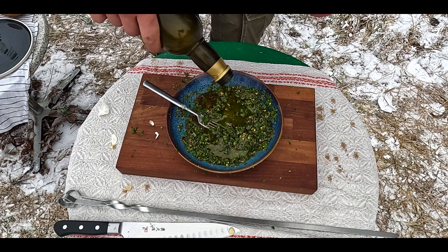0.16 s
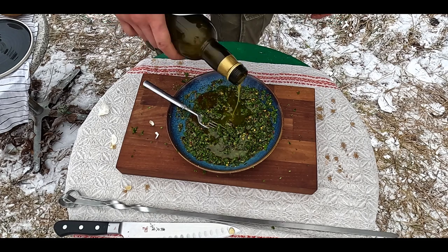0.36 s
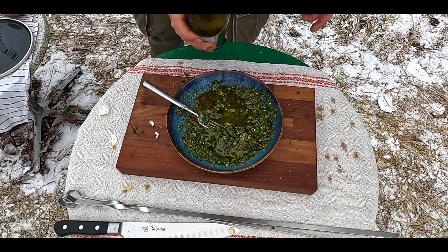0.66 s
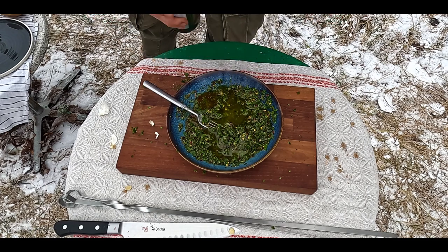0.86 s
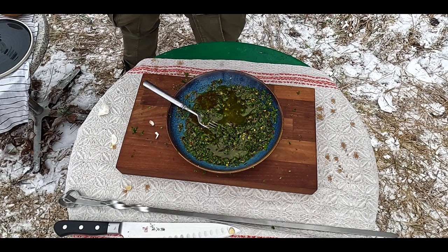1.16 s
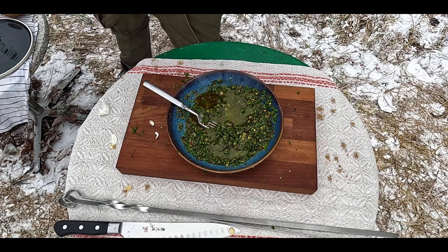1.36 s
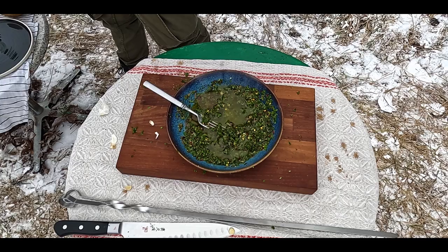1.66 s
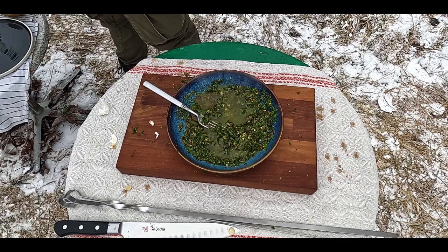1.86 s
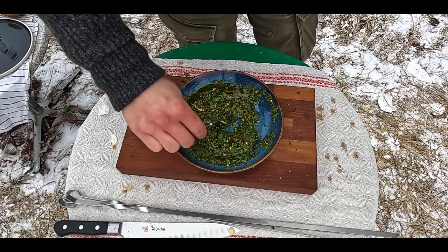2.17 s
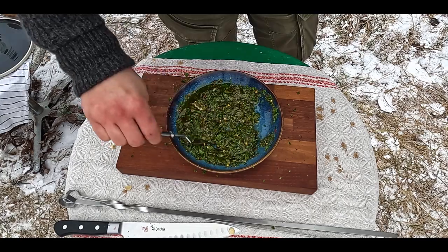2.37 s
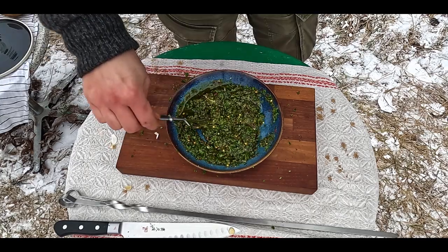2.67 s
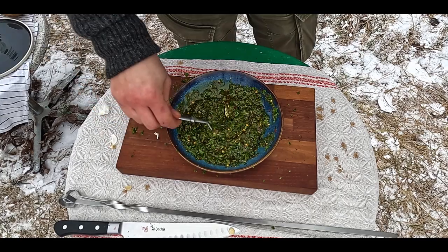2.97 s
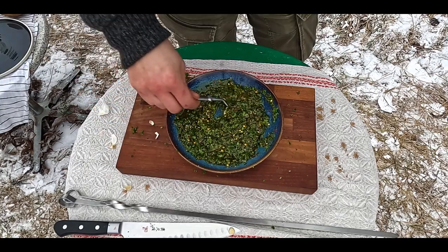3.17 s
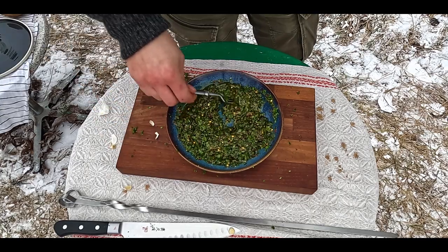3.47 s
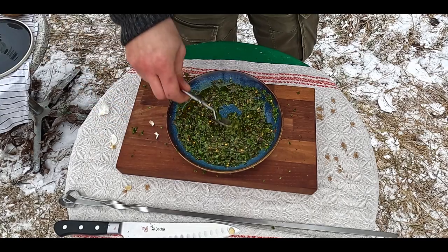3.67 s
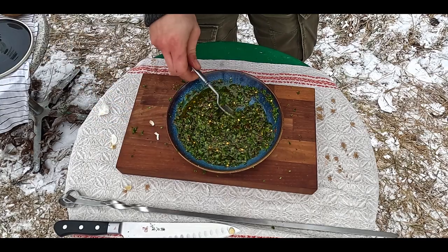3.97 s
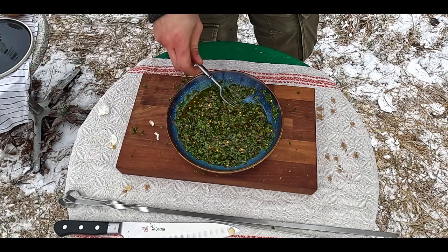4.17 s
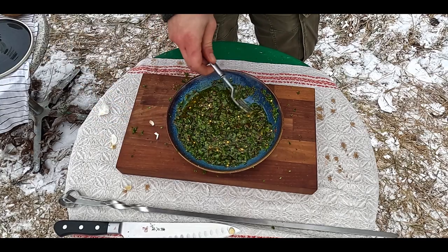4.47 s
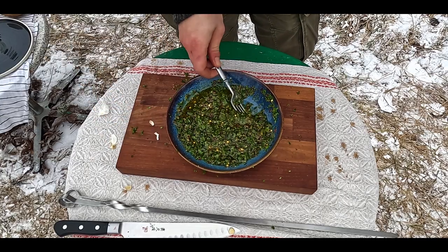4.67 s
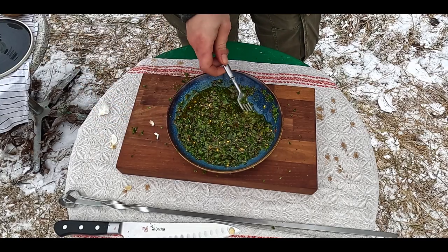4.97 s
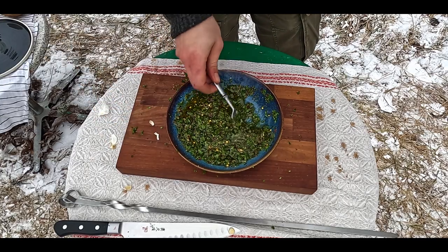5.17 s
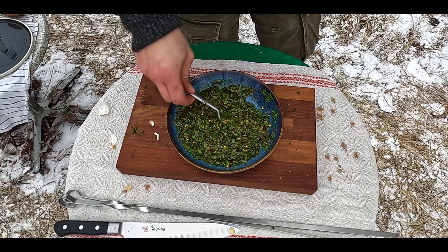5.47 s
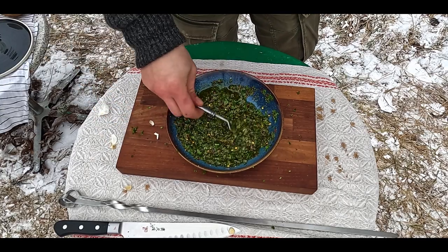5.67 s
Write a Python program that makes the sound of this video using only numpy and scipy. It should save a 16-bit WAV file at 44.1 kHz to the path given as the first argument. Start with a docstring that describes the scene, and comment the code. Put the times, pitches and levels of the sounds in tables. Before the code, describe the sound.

Outdoors, a bottle gulps softly, crusty snow cracks underfoot, then wet squelchy stirring builds to a run of short, bright fork-on-bowl clinks.

```python
"""A steel fork stirs a wet mix of oil and chopped herbs in a ceramic bowl, outdoors in winter.
The tines skid and ring the bowl, modal knocks answer from its board; resonant grains squelch, pop and spray.
Before that, oil glugs from a glass bottle (gliding tones) and icy snow crunches (bursts of filtered grains).
Light air sways and rumbles at the microphone under an even hiss (filtered noise)."""
import sys
import numpy as np
from scipy import signal
from scipy.fft import rfft, irfft
from scipy.io import wavfile
from scipy.ndimage import map_coordinates

SR = 44100
rng = np.random.default_rng(int(sys.argv[2]) if len(sys.argv) > 2 else 0)


def wav_record(signal):
    """Record a signal, one row per channel, as 16-bit PCM in the file named by sys.argv[1]."""
    frames = np.transpose(np.atleast_2d(signal))
    bounded = np.clip(frames, -1, 1)
    # unit amplitude maps onto the largest positive 16-bit level
    quanta = np.round(bounded * 32767).astype(np.int16)
    wavfile.write(sys.argv[1], SR, quanta)


N = 256750  # samples
T = np.arange(N) / SR  # s, whole scene
HIT = np.arange(SR // 5) / SR  # s, span of one event

# fork on bowl: t/s, skid peak/dB, skid f/Hz, ring re skid/dB, knock peak/dB
FORK_CLINKS = [(3.2332, -32, 2620, -18.5, -55.5), (3.5056, -37.5, 2490, -23, -52.5),
               (3.892, -32, 2370, -13, -34), (4.14, -45.5, 2250, -16, -44), (4.377, -25, 2280, -11, -33),
               (4.61, -45, 3100, -16.5, -61), (4.865, -31.5, 3260, -7, -40), (4.925, -32, 1930, -33, -42.5),
               (5.1015, -26, 3500, -5.5, -36.5)]
# briskness of the stirring: t/s, spray level/dB
STIR_BRISKNESS = [(2.0, -89), (2.4, -79), (2.75, -79), (3.45, -68.5), (4.3, -71.5), (5.0, -80),
                  (5.82, -84.5)]
# spectrum of wet leaves and oil: f/Hz, relative gain/dB
MASH_SPECTRUM = [(250, -7), (450, -2), (800, -9), (1150, -4), (1500, 0), (2100, -10.5), (3200, -3),
                 (4500, -11), (7000, -19)]


def fork():
    """Tines bite and skid on the glaze, ring the bowl and push it against the board."""
    # bowl and fork together: f/Hz, level before damping/dB, t60/s
    bowl_modes = [(866, -38, 0.082), (1848, -18, 0.06), (2320, -10.5, 0.028), (3070, -3.5, 0.056),
                  (3540, -4, 0.028), (4480, -1, 0.054), (7860, -2, 0.048), (9850, -9, 0.038),
                  (11940, 6, 0.042), (12000, -10, .025), (14000, -15, .035)]
    # tine contact spectrum: f/Hz, relative gain/dB
    contact_spectrum = [(300, -0.5), (1200, -5), (2300, -4.5), (2750, -9), (3400, -7.5), (4600, -0.5),
                        (5400, -8.5), (7500, -2), (9000, -12), (12000, -11), (16000, -9.5)]
    # bowl foot dropping back on the board: t/s, peak/dB, knock f/Hz
    rocks = [(4.9257, -40.5, 760), (4.9457, -29, 470), (4.9654, -38.5, 480), (4.972, -37, 420)]
    # soft low thumps: t/s, level/dB, rise/s
    thuds = [(2.0319, -34, 0.002), (4.945, -44, .008)]
    bite_s, skid_t60_s, thud_t60_s = 0.00065, 0.039, 0.11
    second_tine_s, second_tine_db = 0.006, -9.5  # tines land one after the other
    # below this ring level herbs cushion the bowl: dB lost in its top mode for each dB
    free_ring_db, damping = -12.5, 3.3
    knock_per_skid, knock_lag_s = 0.12, 0.00185  # pitch ratio; the board answers late

    out = np.zeros(N)
    for s, db, skid_hz, ring_db, knock_db in FORK_CLINKS:
        top_db = damping * min(ring_db - free_ring_db, 0)
        top_hz = bowl_modes[-1][0]
        modes = [(hz, level + top_db * (hz / top_hz) ** 2, t60) for hz, level, t60 in bowl_modes]
        for k in range(2):
            grit = grains(len(HIT), rate=11000, spread_db=4) * fade(skid_t60_s)
            grit = colour(grit, contact_spectrum)
            skid = crest(resonate(grit, skid_hz, q=10) + 0.3 * grit)
            onset = 1 - np.exp(-HIT / bite_s)
            contact = (skid + amp(ring_db) * ring(modes, scatter_db=1.5)) * onset
            add(out, s + k * second_tine_s, amp(db + k * second_tine_db) * contact)
        board = knock(knock_per_skid * skid_hz, soft_s=0.0024, focus_db=5.5)
        add(out, s + knock_lag_s, amp(knock_db) * board)
    for s, db, push_hz in rocks:
        add(out, s, amp(db) * knock(push_hz, soft_s=0.00013, focus_db=13))
    for s, db, rise_s in thuds:
        decay = fade(thud_t60_s) * np.linspace(1, 0, len(HIT))
        add(out, s, -amp(db) * decay * (1 - np.exp(-(HIT / rise_s) ** 2)))
    return out


def knock(push_hz, soft_s, focus_db):
    """Board modes lose focus_db per octave from the push pitch; a soft push lets them swell."""
    # board: f/Hz, level at push pitch/dB, t60/s
    board_modes = [(183.7, -9, 0.087), (330.4, -2, 0.054), (437.4, -5, 0.047), (491, -3.5, 0.036),
                   (600, -15, 0.032), (762, -10, 0.027), (869, -6.5, 0.1), (1308, -12.5, 0.049),
                   (1915, -4.5, 0.037)]
    modes = [(hz, db - focus_db * abs(np.log2(hz / push_hz)), t60) for hz, db, t60 in board_modes]
    return crest(ring(modes, scatter_db=3.5) * (1 - np.exp(-HIT / soft_s)))


def herbs():
    """Oily leaves squelch and pop under each stroke while tiny films burst in a fine spray."""
    # fork strokes: middle t/s, rms/dB, half length/s, f/Hz, spray level/dB
    squelches = [(2.066, -60, 0.026, 2200, -56.5), (2.168, -61.5, 0.017, 2030, -58.5),
                 (2.502, -56.5, 0.025, 3360, -68.5), (2.865, -62.5, .022, 3280, -71),
                 (2.924, -59, 0.009, 2400, -74), (2.99, -72, 0.012, 3000, -67),
                 (3.131, -67, 0.03, 1820, -64), (3.43, -70, 0.013, 2570, -62),
                 (3.578, -61, 0.046, 2390, -64), (5.462, -63.5, 0.038, 1770, -69.5),
                 (5.575, -67.5, 0.039, 2580, -67.5), (5.772, -58.5, 0.026, 3170, -68)]
    # clearest wet pops: t/s, peak/dB, f/Hz
    clear_pops = [(2.037, -45.5, 2500), (2.433, -45, 4570), (2.476, -44.5, 3520), (2.815, -46, 2400),
                  (3.076, -44, 4560), (3.574, -42, 1770), (3.662, -41.5, 3570)]
    # long drags through the thick of the mix: from t/s, to t/s, level/dB
    drags = [(2.38, 3.203, -68.5), (3.35, 3.705, -71), (5.35, 5.9, -70)]
    # spray spectrum: f/Hz, relative gain/dB
    spray_spectrum = [(2500, -22.5), (5500, -17.5), (7000, 3.5), (8200, 1.5), (9400, -18.5), (11500, -1.5),
                      (16000, -21)]
    drag_edge_s = 0.34
    slosh_hz, slosh_q, slosh_db = 447, 4.5, 3  # oil sloshes behind a dragging fork
    # after a firm clink the fork slides on through the herbs
    firm_db, slide_lag_s, slide_half_s, slide_hz = -36, 0.032, 0.038, 2640
    slide_db, slide_spray_db = -68.5, -65.5
    glide_octaves = -0.25  # the pocket behind the fork opens and its pitch sinks
    pop_t60_s, pop_q, pop_click = 0.0096, 3.5, 0.15  # last: share of plain click

    spray_db, = curves(STIR_BRISKNESS)
    clumps_db = 2.2 * wobble(22)
    drag = sum(amp(db) * hold(start, end, drag_edge_s) for start, end, db in drags)
    leaves = colour(grains(N, rate=900, spread_db=2), MASH_SPECTRUM)
    slosh = amp(slosh_db) * wander(leaves, slosh_hz, slosh_q, octaves=0.19)
    mash = drag * amp(clumps_db / 2) * unit(leaves + slosh)
    spray_power = (T > STIR_BRISKNESS[0][0]) * amp(spray_db + 1.16 * clumps_db) ** 2

    slides = [(s + slide_lag_s, slide_db, slide_half_s, slide_hz, slide_spray_db)
              for s, db, *_ in FORK_CLINKS if db > firm_db]
    for s, db, half_s, hz, stroke_spray_db in squelches + slides:
        squelch = stroke(half_s, hz, glide_octaves, MASH_SPECTRUM, rate=1000, spread_db=1, q=8.3)
        add(mash, s - HIT.mean(), amp(db) * squelch)
        spray_power += (amp(stroke_spray_db) * swell(s, half_s)) ** 2
    for s, db, hz in clear_pops + small_pops(count=40, scatter_db=7):
        snap = rng.standard_normal(len(HIT)) * fade(pop_t60_s)
        add(mash, s, amp(db) * crest(resonate(snap, hz, pop_q) + pop_click * snap))

    spray_gain = np.sqrt(spray_power)
    spray, stray = [spray_gain * unit(colour(grains(N, rate=3500, spread_db=2), spray_spectrum))
                    for _ in range(2)]
    fizz = 0.5 * spray_gain * bubbles(count=700, hz=6700, cycles=6.9)
    return widen(mash + spray + fizz, stray)


def small_pops(count, scatter_db):
    """Chance pops while the fork stirs, stronger when it is brisk: t/s, peak/dB, f/Hz."""
    over_spray_db, middle_hz = 14.5, 7000
    times, spray_db = np.transpose(STIR_BRISKNESS)
    when = rng.uniform(times[0], times[-1], count)
    size, octaves = rng.uniform(-1, 1, (2, count))
    peak_db = np.interp(when, times, spray_db) + over_spray_db + scatter_db * size
    return list(zip(when, peak_db, middle_hz * 2 ** octaves))


def bubbles(count, hz, cycles):
    """Tiny bursting films, each a few cycles at its own pitch; rms 1."""
    when = rng.integers(0, N, count)
    pitch, size = rng.standard_normal((2, count))
    t = HIT[:SR // 150]
    turns = np.minimum(hz * 2 ** (pitch / 2), SR / 3)[:, None] * t
    pings = amp(2.7 * size)[:, None] * np.sin(2 * np.pi * turns) * np.exp(-turns / cycles)
    at = when[:, None] + np.arange(len(t))
    return unit(np.bincount(at.ravel(), pings.ravel(), N)[:N])


def snow():
    """Bursts of breaking ice grains over the softer shearing and packing of snow."""
    # crust giving way: t/s, peak/dB, main f/Hz, t60/s
    crunches = [(.682, -47, 2730, .008), (1.095, -23, 2020, 0.02), (1.194, -34, 4100, 0.019),
                (1.2935, -41.5, 1480, .026), (1.313, -36, 1420, 0.02), (1.332, -38, 1390, 0.019),
                (1.692, -41, 2520, 0.048), (1.8264, -18.5, 2590, 0.032)]
    # snow shearing between the breaks: middle t/s, rms/dB, half length/s, f/Hz
    shears = [(0.664, -65.5, 0.031, 2460), (1.114, -49.5, 0.01, 2830), (1.18, -53, 0.023, 2410),
              (1.275, -61.5, 0.03, 1800), (1.697, -55, 0.008, 1690), (1.779, -48, 0.014, 2460),
              (1.823, -46, 0.0042, 1920)]
    # full weight comes onto one foot: middle t/s, level before halving/dB, half length/s
    steps = [(1.32, -58.5, 0.1), (1.756, -57, 0.066)]
    # crust spectrum: f/Hz, relative gain/dB
    crust_spectrum = [(150, -20), (700, -16), (1000, -14.5), (1400, -1), (2000, -2.5), (2800, -0.5),
                      (3400, -12.5), (4100, -15.5), (4800, -9), (5500, -20.5), (9000, -18), (11000, -25),
                      (16000, -29)]
    # packing spectrum: f/Hz, relative gain/dB
    packing_spectrum = [(88, -25), (150, -3.5), (489, -1.5), (1190, -7), (1390, -4), (1990, -16),
                        (2210, -5), (2580, -19), (3510, -7), (9000, -30), (11700, -76), (19800, -120)]
    aftercrack_s, aftercrack_loss_db = 0.008, 8  # each break runs on in a weaker crack
    tread_from_s, tread_to_s, tread_edge_s, tread_db = 0.46, 1.77, 0.055, -70  # feet shift

    out = np.zeros(N)
    for s, db, hz, t60 in crunches:
        for k in range(2):
            burst = colour(grains(len(HIT), rate=9800, spread_db=1) * fade(t60), crust_spectrum)
            crack = crest(resonate(burst, hz, q=7.3) + 0.2 * burst)
            add(out, s + k * aftercrack_s, amp(db - k * aftercrack_loss_db) * crack)
    for s, db, half_s, hz in shears:
        shear = stroke(half_s, hz, 0, crust_spectrum, rate=1500, spread_db=1.5, q=1.6)
        add(out, s - HIT.mean(), amp(db) * shear)
    weight = amp(tread_db) * hold(tread_from_s, tread_to_s, tread_edge_s)
    weight += sum(amp(db) * swell(s, half_s) for s, db, half_s in steps) / 2
    packing = colour(grains(N, rate=1500, spread_db=1.5), packing_spectrum)
    creak = 1.4 * wander(packing, hz=1470, q=12, octaves=0.13)
    return out + weight * unit(packing + creak)


def bottle(neck_hz=1115, neck_t60=0.11):
    """Each gulp of air rises in pitch and pings the bottle neck."""
    # air gulped in: t/s, bubble level/dB, start f/Hz, target f/Hz, t60/s, neck re bubble/dB
    glugs = [(0.129, -46, 67, 200, 0.026, -27), (0.506, -44.5, 89, 314, 0.31, -8.5)]
    glide_s = 0.15  # time constant: pitch rises ever more slowly as the bubble leaves the neck
    out = np.zeros(N)
    for s, db, start_hz, target_hz, t60, neck_db in glugs:
        pitch_hz = target_hz + (start_hz - target_hz) * np.exp(-HIT / glide_s)
        bubble = fade(t60) * np.sin(2 * np.pi * np.cumsum(pitch_hz) / SR)
        neck = fade(neck_t60) * np.sin(2 * np.pi * neck_hz * HIT)
        smack = 0.9 * fade(0.041) * unit(colour(rng.standard_normal(len(HIT)), MASH_SPECTRUM))
        add(out, s, amp(db) * (bubble + amp(neck_db) * (neck + smack)))
    return out


def wind():
    """One breeze drives slow pressure swells and a low rumble, under the even hiss of open air."""
    # strength of the breeze: t/s, rumble level/dB
    breeze_strength = [(0, -67.5), (1.6, -63), (2.9, -60.5), (3.45, -58.5), (3.85, -46), (4.3, -47),
                       (4.65, -57.5), (5.82, -57)]
    # rumble spectrum: f/Hz, relative gain/dB
    rumble_spectrum = [(10, 0.5), (25, 4), (50, -16), (100, -17.5), (200, -37), (500, -49.5), (1500, -82.5)]
    # hiss spectrum: f/Hz, relative gain/dB
    air_spectrum = [(59, -29), (100, -15), (193, -6.5), (315, -14), (433, -11.5), (1450, -16), (3120, -14),
                    (3620, -15), (7290, -14.5), (16000, -23)]
    hiss_db = -66
    sway_db, sway_growth = -3.5, 0.53  # level at 0 dB rumble; dB of sway per dB of rumble
    breeze_db, = curves(breeze_strength)
    sway = unit(np.gradient(wobble(6.5))) * signal.windows.tukey(N, 0.05)
    rumble = unit(colour(rng.standard_normal(N), rumble_spectrum))
    hiss, stray = [amp(hiss_db) * unit(colour(rng.standard_normal(N), air_spectrum))
                   for _ in range(2)]
    moving = amp(sway_db + sway_growth * breeze_db) * sway + amp(breeze_db) * rumble
    return widen(hiss + moving, stray)


def widen(mid, diffuse):
    """Left and right share the middle; diffuse sound, mostly treble, enters with opposite signs."""
    # diffuse sound: f/Hz, side gain/dB
    side_gain = [(100, -27), (1000, -31), (2500, -12.5), (4500, -4.5), (8000, -4), (14000, -0.5)]
    side = colour(diffuse, side_gain)
    return np.array([mid + side, mid - side])


def stroke(half_s, hz, glide, spectrum, rate, spread_db, q):
    """A centred swell of grains whose resonance glides by so many octaves; rms 1 in its core."""
    u = (HIT - HIT.mean()) / half_s
    grit = colour(grains(len(HIT), rate, spread_db), spectrum)
    tone = sum(np.exp(-(u - k) ** 2) * resonate(grit, hz * 2 ** (glide * k / 2), q)
               for k in (-1, 0, 1))
    sound = (tone + 0.15 * grit) * np.exp(-np.abs(u) * u * u / 3)
    return sound / np.std(sound[np.abs(u) < 1])


def ring(modes, scatter_db):
    """Damped modes, each at a new strength and sign."""
    out = np.zeros(len(HIT))
    for hz, db, t60 in modes:
        strength = rng.choice([-1, 1]) * amp(db + scatter_db * rng.standard_normal())
        out += strength * fade(t60) * np.sin(2 * np.pi * hz * HIT)
    return out


def grains(n, rate, spread_db):
    """Dense tiny clicks of scattered size, rate per second, rms 1."""
    count = int(n * rate / SR)
    sizes = rng.standard_normal(count) * amp(spread_db * rng.standard_normal(count))
    return unit(np.bincount(rng.integers(0, n, count), sizes, n))


def wander(x, hz, q, octaves):
    """A resonance that drifts slowly about its pitch, crossfading three fixed ones."""
    place = np.clip(wobble(5), -1, 1)
    return sum(np.maximum(1 - np.abs(place - k), 0) * resonate(x, hz * 2 ** (octaves * k), q)
               for k in (-1, 0, 1))


def resonate(x, hz, q):
    """One resonance with gain 1 at its centre."""
    return signal.lfilter(*signal.iirpeak(min(hz, SR / 4), max(q, 1), SR), x)


def colour(x, points, size=8192):
    """Causal minimum-phase filter through f/Hz, gain/dB points on a log axis."""
    f, db = np.transpose(points)
    bins_hz = np.fft.rfftfreq(size, 1 / SR)
    gain = amp(np.interp(np.log(bins_hz + 1), np.log(f + 1), db))
    cepstrum = irfft(np.log(gain))
    cepstrum[1:size // 2] *= 2  # fold to causal
    cepstrum[size // 2 + 1:] = 0
    impulse = irfft(np.exp(rfft(cepstrum)))[:size // 2]
    return signal.oaconvolve(x, impulse)[:len(x)]


def wobble(rate):
    """A smooth random curve with so many knots a second."""
    knots = rng.standard_normal(int(T[-1] * rate) + 4)
    return map_coordinates(knots, [T * rate], mode="mirror")


def curves(rows):
    """One value per sample for each column after the time."""
    s, *cols = np.transpose(rows)
    return [np.interp(T, s, c) for c in cols]


def hold(start_s, end_s, edge_s):
    """An envelope that rises, holds at 1 and falls; edges centred on start and end."""
    return np.clip(np.minimum(T - start_s, end_s - T) / edge_s + 0.5, 0, 1)


def swell(middle_s, half_s):
    """A bell-shaped envelope of height 1."""
    return np.exp(-((T - middle_s) / half_s) ** 2 / 2)


def fade(t60):
    """Exponential decay after a blow, 60 dB in t60 seconds."""
    return amp(-60 * HIT / max(t60, 1e-3))


def amp(db):
    """Decibels to gain, floored at -400 dB."""
    return np.exp(np.maximum(db, -400) * (np.log(10) / 20))


def unit(x):
    """Scale to rms 1."""
    return x / np.sqrt(np.mean(x ** 2) + 1e-20)


def crest(x):
    """Scale to peak 1."""
    return x / np.abs(x).max()


def add(track, s, sound):
    """Mix a sound in at time s."""
    i = max(round(s * SR), 0)
    track[i:i + len(sound)] += sound[:len(track[i:])]


def scene():
    """Close, dry sources in the middle, with a faint scatter from table and ground."""
    close = fork() + snow() + bottle()
    tails = rng.standard_normal((2, len(HIT))) * fade(0.044)
    echo, stray = [signal.fftconvolve(close, tail / np.linalg.norm(tail))[:N] for tail in tails]
    return widen(close + amp(-11) * echo, amp(-33) * stray) + herbs() + wind()


def record(dry):
    """A steep elliptic low-pass removes what lies above the band limit."""
    top_hz = 15900
    return signal.sosfilt(signal.ellip(12, 0.1, 80, top_hz, fs=SR, output="sos"), dry)


dry = scene()
out = record(dry)
wav_record(out)
```